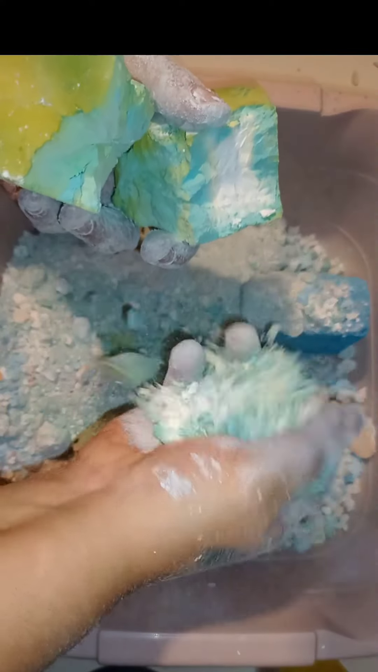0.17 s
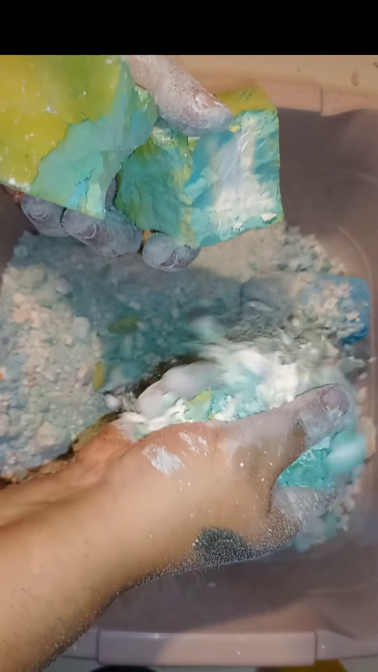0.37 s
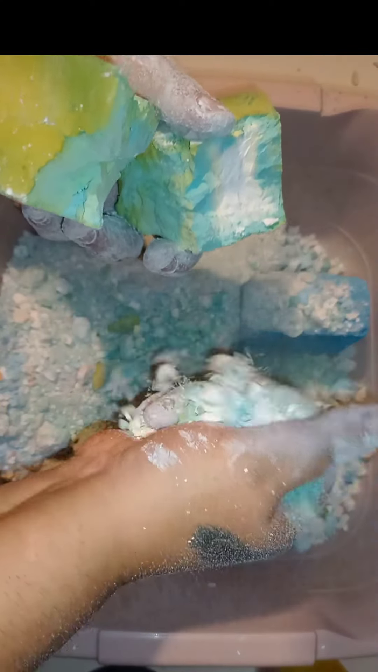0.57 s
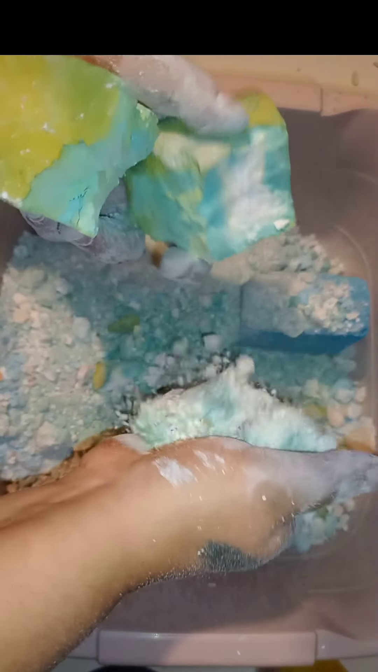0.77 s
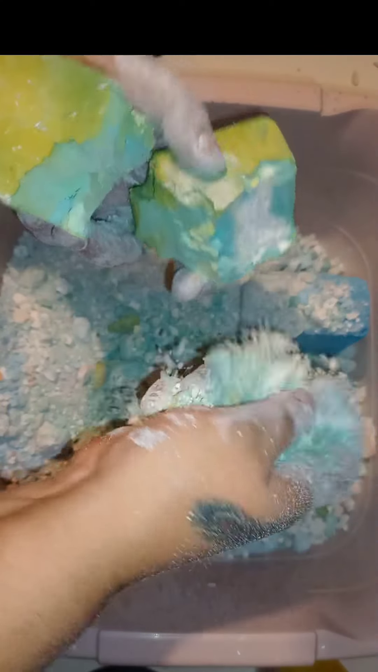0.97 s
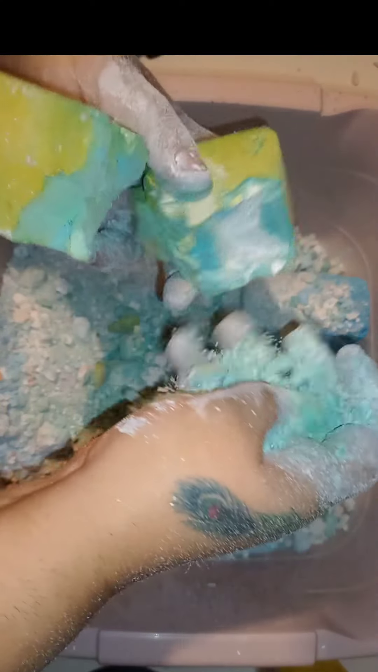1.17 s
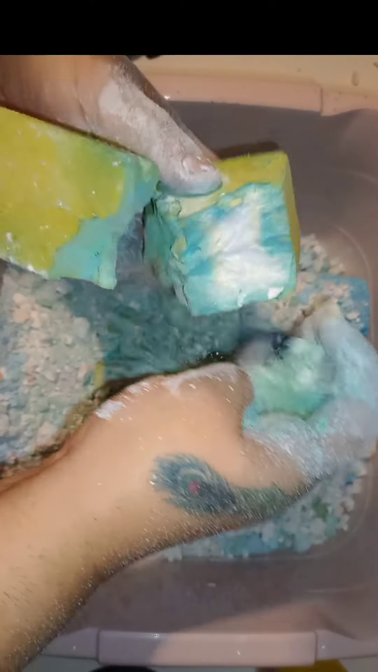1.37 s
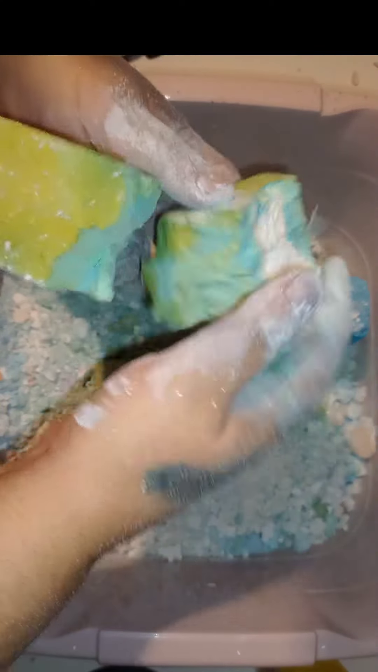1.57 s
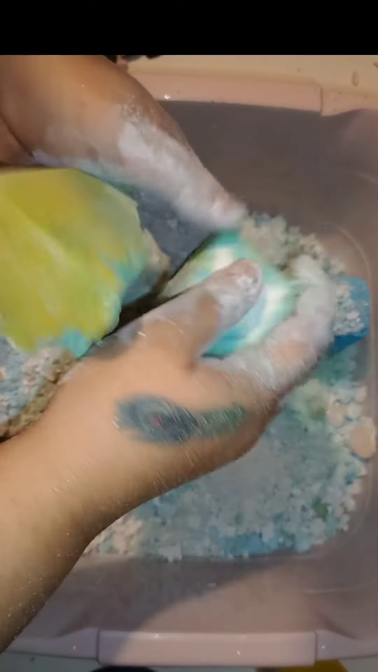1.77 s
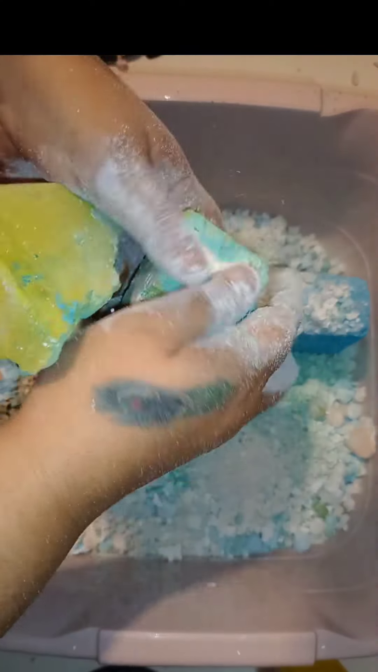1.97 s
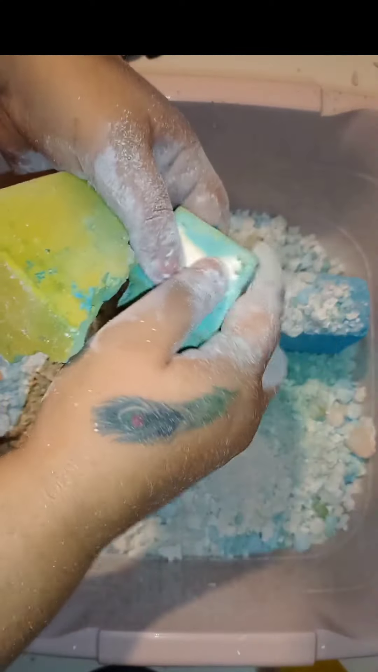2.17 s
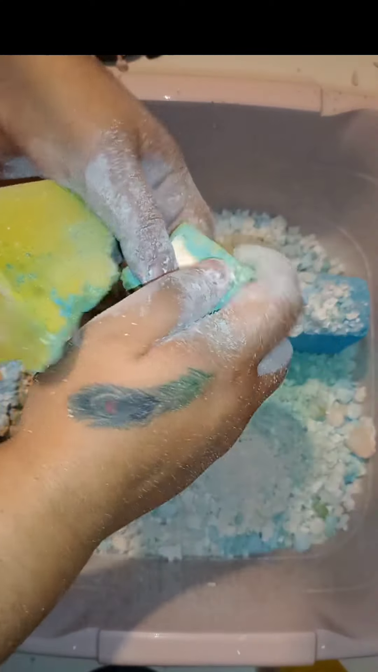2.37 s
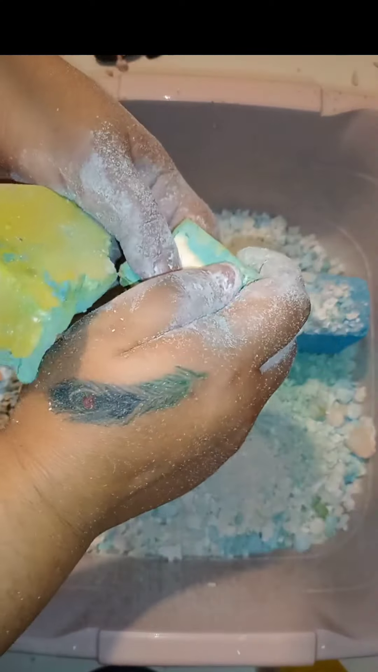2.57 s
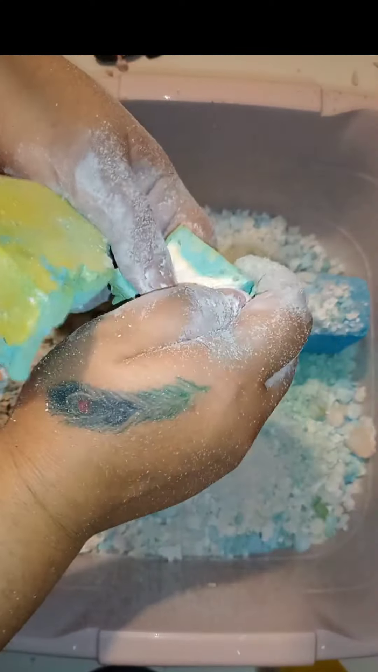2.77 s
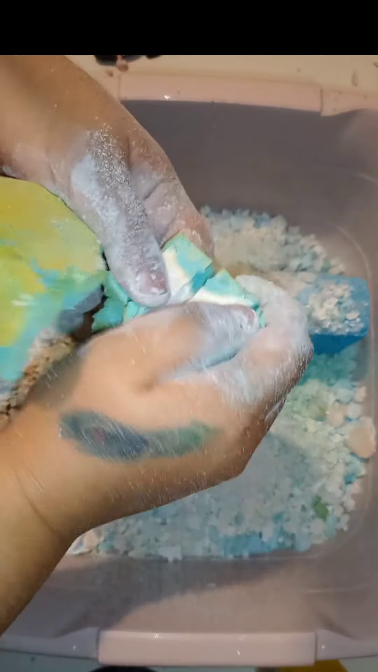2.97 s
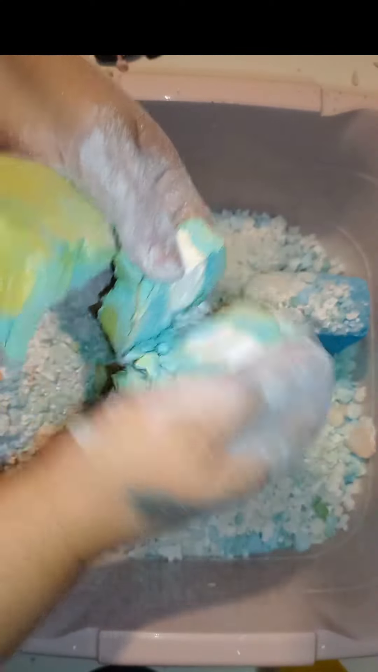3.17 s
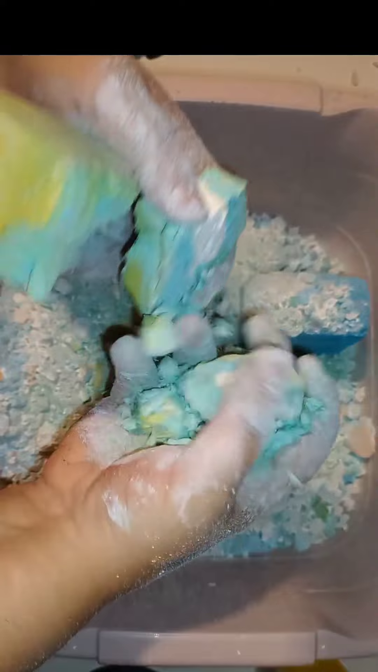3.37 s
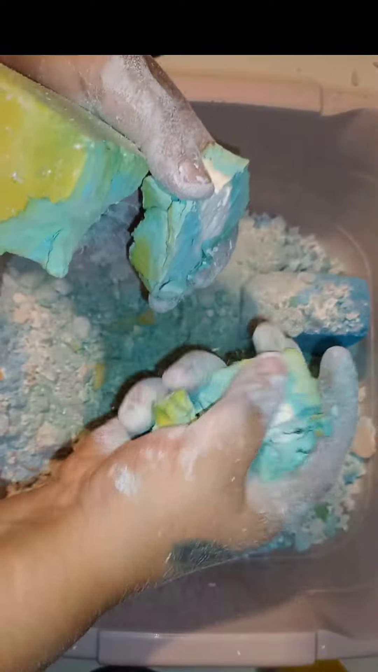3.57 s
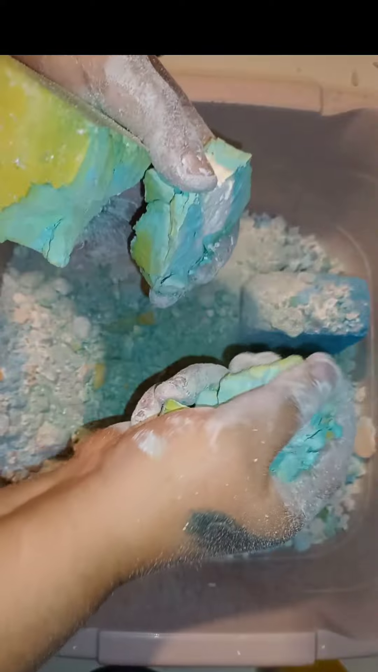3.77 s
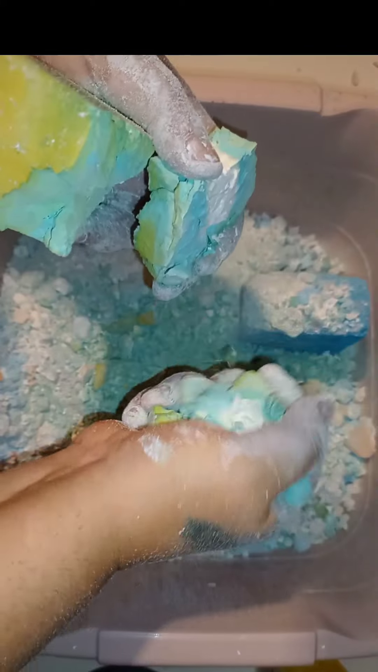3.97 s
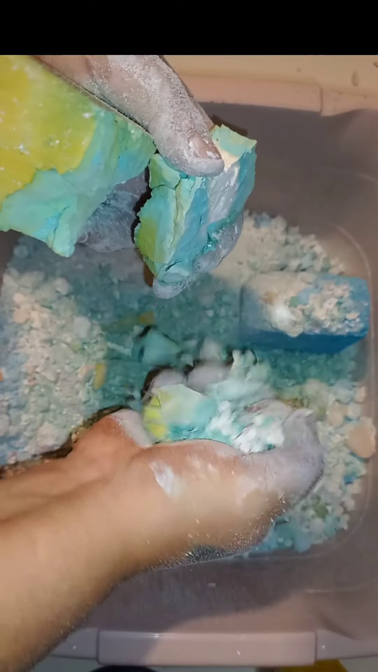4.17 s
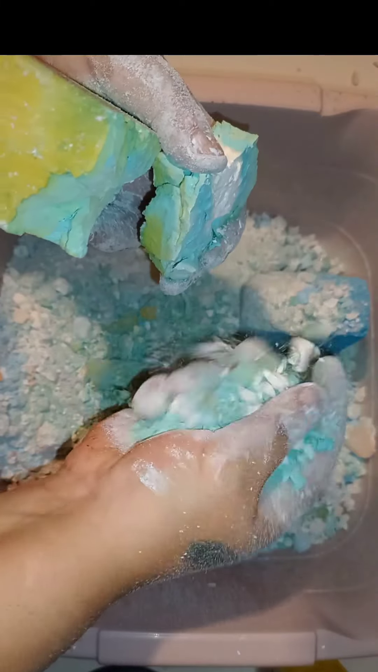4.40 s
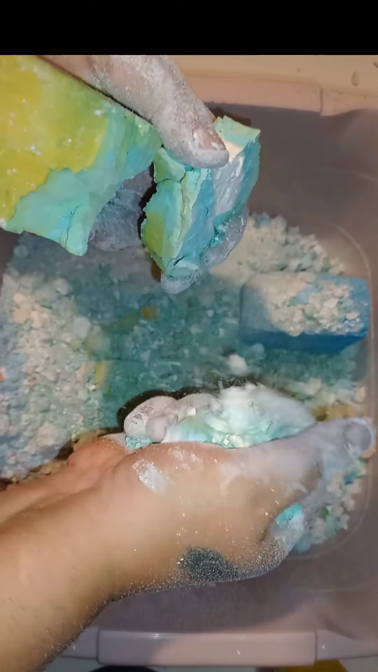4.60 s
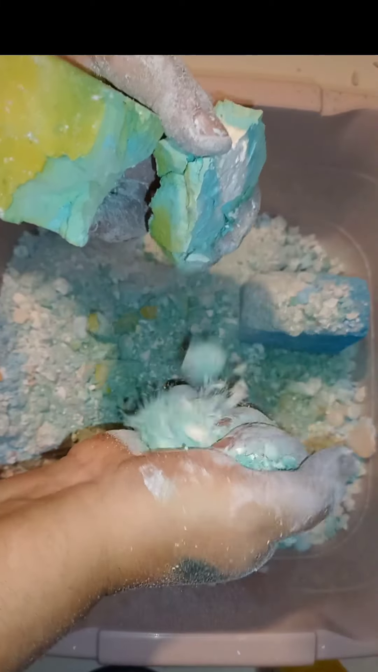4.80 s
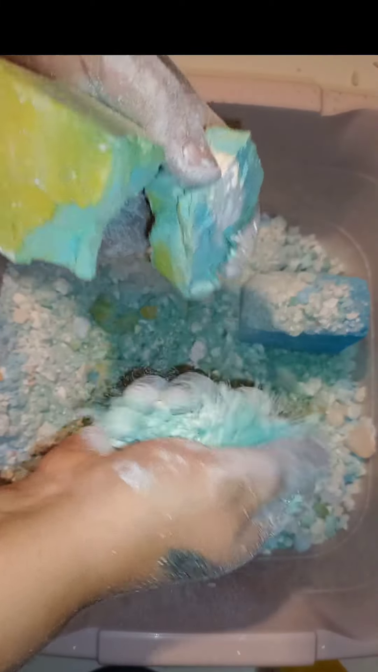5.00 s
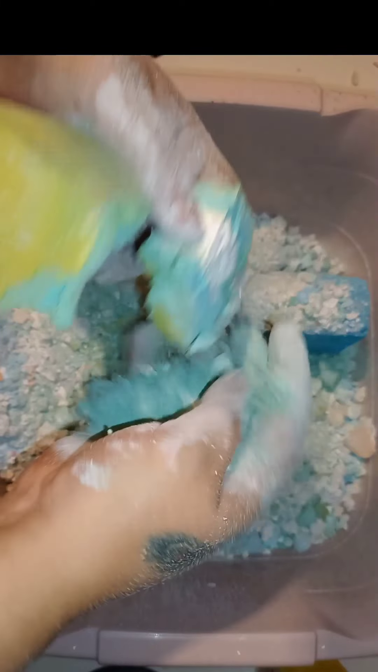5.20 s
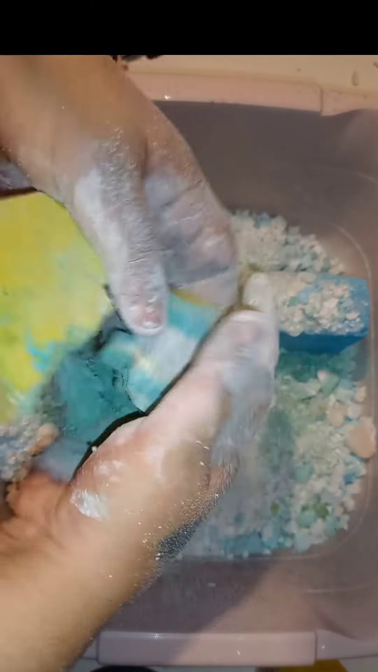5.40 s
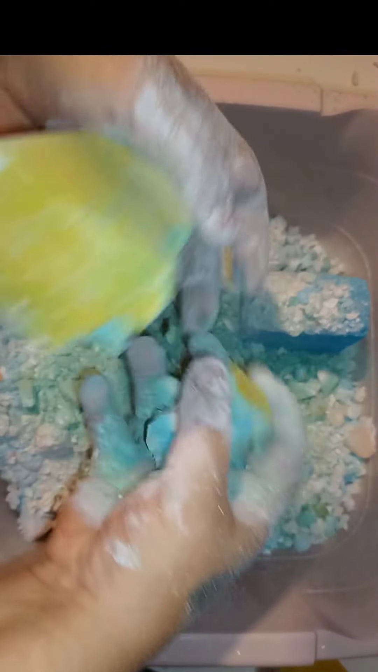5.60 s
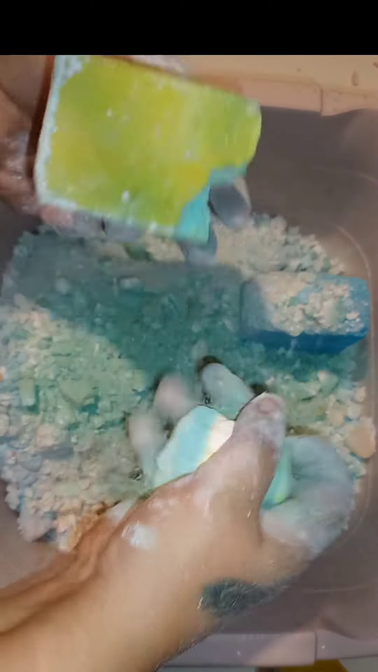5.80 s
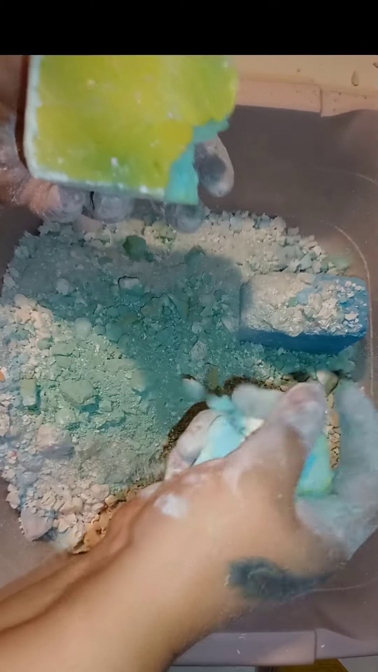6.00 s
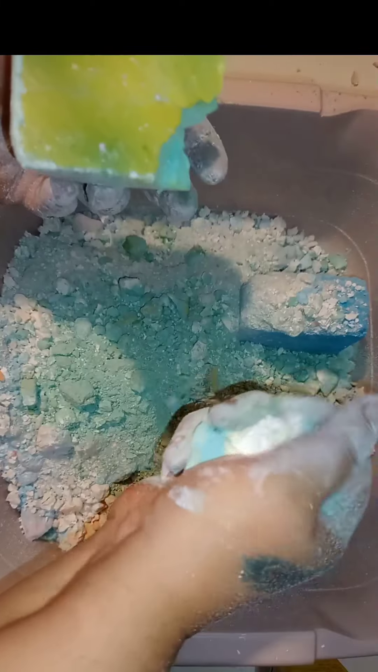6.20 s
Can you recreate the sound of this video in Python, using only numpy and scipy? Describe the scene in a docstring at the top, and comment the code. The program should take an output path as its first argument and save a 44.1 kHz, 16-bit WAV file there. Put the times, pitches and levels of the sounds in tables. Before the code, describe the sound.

Brittle dry lumps crack and crumble in squeezing hands, crisp and close, identical in both channels. Heavy crunching comes first, with crumbs pattering on hollow plastic and a low handling rumble, then dwindles to fine grains. Two tiny finger squeaks frame a near silence before one hard snap. Crushing then resumes, more scattered, with soft tub thuds, dusty hiss and a closing cluster of cracks, over faint room tone.

```python
"""Crushing dry chalk

Hands crush dry chalk over a plastic tub, close to one microphone; both channels are alike.
Lumps crack: a snap and a noise burst drive a resonance. Crumbs crackle: random clicks ring by size.
Dust hisses and rustles as noise, knocks and crumbs ring the tub's modes, a slipping finger squeaks
as resonant noise. Low noise swells as a rumble over a quiet room."""
import sys
import numpy as np
from scipy import signal
from scipy.fft import rfft, irfft
from scipy.io import wavfile

SR = 44100
rng = np.random.default_rng(int(sys.argv[2]) if len(sys.argv) > 2 else 0)


def generate_wav(sig):
    """Save sig (samples, or channels by samples) to the path in sys.argv[1] as 16-bit PCM at SR."""
    pcm = np.round(np.clip(np.atleast_2d(sig).T, -1, 1) * 32767).astype(np.int16)
    wavfile.write(sys.argv[1], SR, pcm)


N = 275580


def from_db(db):
    """dB to gain."""
    return 10 ** (np.asarray(db) / 20)


def rms_one(x):
    """Scale to rms 1."""
    return x / np.sqrt(np.mean(x ** 2) + 1e-20)


def at_hz(spectrum, hz):
    """Spectrum table in dB, interpolated over log frequency."""
    table_hz, table_db = np.transpose(spectrum)
    return np.interp(np.log(hz), np.log(table_hz), table_db)


def drift(rate_hz):
    """Slow noise of rms 1: two-pole low-pass, run at SR / 40."""
    step = 40
    r = np.exp(-2 * np.pi * step * rate_hz / SR)
    settle = 2000
    white = rng.standard_normal(N // step + settle + 2)
    slow = signal.lfilter([1], [1, -2 * r, r * r], white)[settle:]
    return np.interp(np.arange(N) / step, np.arange(len(slow)), rms_one(slow))


def resonance(x, hz, width_hz):
    """Two-pole band-pass, gain about 1 on top."""
    r = np.exp(-np.pi * width_hz / SR)
    zeros = np.array([1, 0, -1]) * (1 - r * r) / 2
    poles = [1, -2 * r * np.cos(2 * np.pi * hz / SR), r * r]
    return signal.lfilter(zeros, poles, x)


def band(x, low_hz, high_hz):
    """Butterworth band-pass along the last axis."""
    return signal.sosfilt(signal.butter(2, [low_hz, high_hz], "band", fs=SR, output="sos"), x)


def coloured(x, spectrum):
    """Filter x by a spectrum table."""
    hz = np.maximum(np.arange(len(x) // 2 + 1) * SR / len(x), 1)
    return irfft(rfft(x) * from_db(at_hz(spectrum, hz)), len(x))


def grit(shape, spread_db):
    """White noise of uneven grain: a few samples stand far out."""
    white = rng.standard_normal(shape)
    grain_db = spread_db * np.minimum(rng.exponential(1, shape), 5)
    return white * from_db(grain_db)


def swell_db(top_s, hold_s, rise_db_per_s, fall_db_per_s):
    """Rise to 0 dB at top_s, hold, fall."""
    t = np.arange(N) / SR - top_s
    return np.minimum(0, np.minimum(rise_db_per_s * t, fall_db_per_s * (hold_s - t)))


# Cracks of lumps: t/s, body peak level/dB, ring f/Hz, ring gain/dB, treble level/dB, low grit level/dB, t60/s
CRACKS = [(0.0343, -21, 4900, 17, -42.5, -46, 0.059), (0.051, -12.5, 4520, 4, -44, -39, 0.11),
          (0.1025, -14.5, 1155, 10, -43, -34.5, 0.15), (0.1974, -12.5, 1410, -7, -36.5, -29.5, 0.05),
          (0.2423, -21.5, 1940, 10, -45, -41, 0.062), (0.263, -21.5, 1250, 1, -43, -43, 0.089),
          (0.3425, -13, 6000, 11.5, -38, -39, 0.027), (0.3696, -15, 7730, 11, -33.5, -40, 0.033),
          (0.4768, -17.5, 1780, 27, -35.5, -29, 0.031), (0.5465, -16, 4970, 17, -37, -38, 0.1),
          (0.5623, -12, 7400, 11, -27, -37, 0.037), (0.5868, -12.5, 1540, 14, -39, -27, 0.017),
          (0.6881, -16.5, 3470, 2, -45, -39, 0.05), (0.6974, -26, 3080, 14, -30, -49, 0.025),
          (0.8996, -4, 2800, 6, -36.5, -38, 0.028), (0.9647, -23, 4870, -1, -48, -44.5, 0.15),
          (1.051, -23, 5370, 5, -40, -48, 0.056), (1.064, -20, 2920, -11, -62, -43, 0.095),
          (1.173, -28, 5710, 22, -51, -55, 0.064), (1.27, -35.5, 1190, 9, -55, -43, 0.1),
          (1.3428, -31.5, 1416, 12, -55, -52, 0.13), (1.4316, -26.5, 1490, 12, -51, -50, 0.05),
          (1.506, -28.5, 4530, 5, -48, -59, 0.059), (1.6147, -26.5, 3760, 6, -51, -55, 0.04),
          (1.6911, -31, 6100, 7, -54, -53, 0.034), (1.7548, -32.5, 3340, 9, -57, -48.5, 0.05),
          (1.7827, -25, 2940, -3, -52, -46, 0.15), (2.0002, -37, 2960, 5, -62, -57, 0.024),
          (2.7048, -25.5, 2260, 11, -67, -71, 0.036), (2.7566, -41.5, 2200, 9, -71, -70, 0.041),
          (2.8002, -28.5, 2190, 8, -55, -59, 0.05), (2.8228, -12.5, 2110, 19, -38, -31.5, 0.094),
          (2.8333, 1, 3790, 6, -32.5, -26, 0.026), (3.0705, -16, 3370, 5.5, -58, -50, 0.043),
          (3.1622, -29, 1420, 24, -58, -53, 0.042), (3.2455, -31.5, 7040, 15, -48, -64, 0.031),
          (3.3076, -36.5, 2140, 5, -53.5, -53, 0.15), (3.5286, -34, 3290, 19, -46, -57, 0.15),
          (3.5902, -27.5, 6270, 8, -49, -55, 0.15), (3.643, -32.5, 6000, 14, -49.5, -50.5, 0.13),
          (3.674, -15.5, 3010, 7, -49, -53, 0.04), (3.709, -16, 2210, 8, -43.5, -40.5, 0.054),
          (3.7606, -27, 2740, 13, -51, -50, 0.05), (3.7984, -13.5, 2140, 5, -44.5, -44.5, 0.091),
          (3.8893, -23.5, 2160, 5, -42, -48, 0.057), (3.925, -19, 1420, 4.5, -36.5, -40, 0.077),
          (3.9517, -21, 3770, 4, -49, -42.5, 0.05), (3.9792, -16, 4350, 10, -36.5, -40, 0.05),
          (4.0198, -10, 1030, 8, -30, -41, 0.05), (4.0686, -21, 1030, 19, -43.5, -38, 0.15),
          (4.125, -10.5, 3140, 5, -43, -30.5, 0.044), (4.1631, -10.5, 1550, 2, -33, -28, 0.056),
          (4.1734, -10.5, 3630, -4, -43, -36, 0.042), (4.3439, -24, 1440, 16, -50, -38.5, 0.086),
          (4.4416, -19.5, 3480, 5, -44, -46, 0.029), (4.512, -8, 2610, 10, -40, -30.5, 0.017),
          (4.6001, -25, 1100, 9, -49, -35.5, 0.05), (4.6394, -26, 1610, 9, -50, -36, 0.055),
          (4.6641, -18.5, 1600, 6.5, -43, -31.5, 0.073), (4.7353, -30, 7050, 17, -46, -46, 0.088),
          (4.8319, -24.5, 1070, 23, -52, -42.5, 0.15), (4.8578, -20, 2310, 4, -41.5, -35.5, 0.14),
          (4.9756, -27, 3930, 14, -46, -58, 0.05), (5.011, -28.5, 4280, 13, -61, -63, 0.041),
          (5.0352, -25, 2370, 4, -56, -63, 0.087), (5.0903, -18, 1015, 14, -36, -37.5, 0.14),
          (5.1385, -27, 1630, 7, -51, -41, 0.045), (5.161, -21.5, 1370, 9, -49, -49, 0.056),
          (5.2405, -32, 2720, 11, -58, -44.5, 0.067), (5.3228, -24, 1860, 13.5, -46.5, -53, 0.018),
          (5.3752, -18.5, 2800, -2.5, -40, -47, 0.11), (5.434, -21.5, 1940, 4, -62, -55, 0.11),
          (5.5037, -24, 3520, 7, -48, -48.5, 0.086), (5.6495, -31, 6100, 26, -48, -54, 0.043),
          (5.663, -28.5, 2510, 15.5, -55, -41, 0.14), (5.8477, -20, 3790, 14, -41, -47, 0.12),
          (5.8674, -15.5, 2010, -1, -36, -49, 0.11), (5.9718, -18, 5620, 17, -46, -47, 0.045),
          (5.989, -26.5, 3400, 9, -52, -47.5, 0.066), (6.0302, -19.5, 2270, 14.5, -45, -45, 0.046),
          (6.0561, -26, 1900, 27, -58, -36, 0.028), (6.0641, -23, 2600, 29, -55, -35, 0.05),
          (6.0836, -22.5, 2150, 31, -49, -40, 0.04), (6.119, -8.5, 2650, 4, -39, -33, 0.071),
          (6.1492, -12, 1360, 5, -37, -29.5, 0.11)]
# Colour of breaking chalk, also used for crumbs: f/Hz, level/dB per Hz
GRIT = [(290, -3), (500, 5.5), (545, -1), (988, -7.5), (1320, -1), (2230, 6.5), (5240, 2.5), (7750, 2),
        (8830, -13), (13600, -17), (16000, -22)]
CREEP_DB, CREEP_S = -8, 0.0034   # top and time constant of the growth before a crack
SNAP_DB, SNAP_DB_PER_DB = 11.5, 0.28   # snap gain at a -18 dB peak; its rise with peak level
RING_WIDTH = .06   # share of ring f


def cracks():
    """A fracture creeps, snaps through a lump and dies away as grit; the lump rings at its own pitch."""
    lead = SR // 40
    t_s = np.arange(-lead, SR // 6) / SR
    after_s = np.maximum(t_s, 0)
    creep = np.where(t_s < 0, from_db(CREEP_DB) * np.exp(t_s / CREEP_S), 1)
    snap = 2 * np.sin(2 * np.pi * 3000 * after_s) * np.exp(-(after_s / 0.00014) ** 2)   # push, recoil
    onset = slice(lead - 200, lead + 600)   # sets the rms of treble and low grit
    noise = grit((len(CRACKS), len(t_s)), spread_db=3.5)
    out = np.zeros(N + len(t_s))
    for (s, peak_db, hz, ring_db, treble_db, low_db, t60_s), white in zip(CRACKS, noise):
        fall = from_db(-60 * after_s / np.clip(t60_s, .008, .3))
        fall = fall + 0.5 * from_db(-60 * after_s / 0.13)   # common tail
        burst = rms_one(coloured(white, GRIT)) * creep * fall
        snap_db = SNAP_DB + SNAP_DB_PER_DB * (peak_db + 18)
        force = burst + from_db(snap_db) * snap
        ring = from_db(ring_db) * resonance(force, hz, RING_WIDTH * hz)
        body = band(force, 1200, 8000) + ring
        sound = body / np.max(np.abs(body)) * from_db(peak_db)
        treble = band(burst, 7800, 15500)
        low = band(burst, 700, 1500)
        sound = sound + from_db(treble_db) * treble / np.std(treble[onset])
        sound = sound + from_db(low_db) * low / np.std(low[onset])
        at = round(s * SR)
        out[at:at + len(t_s)] += sound
    return out[lead:N + lead]


# Crumbling: t/s, crackle level/dB, coarse grit level/dB, patter on the tub level/dB
CRUMBLE = [(0.0, -38, -45, -44), (0.26, -37, -39, -36.5), (0.61, -36.5, -39.5, -38),
           (0.73, -35.5, -39.5, -35), (.84, -48.5, -51.5, -42.5), (1.1, -45.5, -55.5, -47),
           (1.34, -48, -49.5, -46.5), (1.75, -50, -60, -44.5), (1.98, -60, -64, -54.5),
           (2.66, -60.5, -63, -54), (2.92, -77, -64.5, -62.5), (3.5, -61, -64, -62.5),
           (3.71, -41, -56, -49.5), (3.86, -50, -53.5, -55), (4.02, -43, -49.5, -51.5),
           (4.16, -44, -47.5, -48), (4.31, -55, -46, -58), (4.37, -46, -55.5, -50),
           (4.52, -40.5, -39, -31.5), (4.68, -39.5, -40.5, -36.5), (4.79, -51.5, -42, -38),
           (4.93, -54.5, -58, -52), (5.08, -40, -52, -45), (5.28, -52.5, -51.5, -47.5),
           (5.36, -61, -58, -45.5), (5.41, -38, -56, -41), (5.6, -41.5, -59, -40.5),
           (5.72, -56, -61, -50.5), (5.93, -51.5, -59, -51), (6.08, -38.5, -40.5, -37.5),
           (6.18, -42, -52, -43.5), (6.25, -53, -55, -47.5)]


def crumble_levels_db():
    """Crackle, coarse grit and patter levels, interpolated to every sample."""
    s, *levels_db = np.transpose(CRUMBLE)
    return [np.interp(np.arange(N) / SR, s, level_db) for level_db in levels_db]


# Puffs of fine dust sliding off the hands: t/s of top, hold/s, level/dB
RUSTLES = [(.45, .04, -46), (1.83, 0.043, -53.5), (3.32, 0.046, -68), (4.736, 0.018, -58.5),
           (4.93, 0.034, -54), (5.288, .03, -66), (5.5, 0.11, -61), (5.827, .04, -56)]
RUSTLE_RISE_DB_PER_S, RUSTLE_FALL_DB_PER_S = 300, 300
DUST_DB, DUST_DB_PER_DB = -65, .7   # level at -50 dB crackle; share of the crackle's swing


def dust_level(crackle_db):
    """Gain of the fine dust: it follows the crackle, and puffs add to it."""
    level = from_db(DUST_DB + DUST_DB_PER_DB * (crackle_db + 50))
    for s, hold_s, db in RUSTLES:
        level = level + from_db(db + swell_db(s, hold_s, RUSTLE_RISE_DB_PER_S, RUSTLE_FALL_DB_PER_S))
    return level


CRUMBS_PER_S, TICKS_PER_S = 26000., 1200
CHIPS_PER_S, CHIP_DB, CHIP_WIDTH_HZ = 600, 5, 35   # harder crumbs that ring longer


def crumbling(crackle, coarse, dust):
    """Tiny fractures in clumps; each crumb rings some cycles, small crumbs high and large ones low."""
    born = rng.random(N) < CRUMBS_PER_S * from_db(2.5 * drift(25)) / SR
    clicks = grit(N, spread_db=2.5) * born * from_db(1.73 * drift(40))
    chips = grit(N, spread_db=2.0) * (rng.random(N) < CHIPS_PER_S / SR)
    chips = rms_one(chips) * np.std(clicks)
    pitches_hz = np.geomspace(600, 15000, 40)
    dealt = rng.integers(0, 40, N)   # pitch index of each click
    sizes = np.zeros((3, N))   # coarse, middling, fine
    for k, hz in enumerate(pitches_hz):
        mine = dealt == k
        crumb = resonance(clicks * mine + 1e-18, hz, 0.084 * hz)
        middling = 1600 < hz < 9500   # only these pitches have chips
        crumb += from_db(CHIP_DB) * resonance(chips * mine * middling + 1e-18, hz, CHIP_WIDTH_HZ)
        patches_db = 4.1 * drift(6.8)   # crumbs of one size come and go
        size = int(hz > 1450) + int(hz > 8000)
        sizes[size] += from_db(at_hz(GRIT, hz) + patches_db) * crumb
    ticks = grit(N, spread_db=6.5) * (rng.random(N) < TICKS_PER_S / SR)   # dry breaks, no ring
    ticks = rms_one(band(ticks, 2300, 6400))
    hiss = rms_one(band(coloured(rng.standard_normal(N), GRIT), 8000, 20000))   # finest dust, even
    sizes[1] = band(rms_one(sizes[1]) + .65 * ticks, 1000, 7450)
    sizes[2] = rms_one(sizes[2]) + 1.1 * hiss
    return sum(level * rms_one(size) for level, size in zip((coarse, crackle, dust), sizes))


# Knocks on the tub: t/s, drive level/dB, f/Hz favoured by the spot hit
KNOCKS = [(0.059, -31, 347), (0.195, -20.5, 395), (0.37, -20.5, 310), (0.698, -27.5, 326),
          (1.264, -32.5, 296), (1.614, -32, 344), (2.001, -23.5, 374), (2.83, -20.5, 402),
          (3.673, -24, 224), (3.759, -30, 231), (3.923, -37, 383), (4.019, -35, 339), (4.348, -6, 180),
          (4.352, -22, 340), (4.466, -16, 222), (4.592, -40, 317), (4.83, -23.5, 360), (5.038, -34, 350),
          (5.377, -18.5, 355), (5.436, -28.5, 335), (5.577, -28, 405), (5.982, -10.5, 165),
          (6.03, -18.5, 234), (6.141, -19, 229)]
# Modes of the tub: f/Hz, level/dB, t60/s
TUB = [(172, -6, 0.1), (231, -3, 0.082), (291, -5.5, 0.086), (345.3, 0, 0.083), (396.3, -0.5, 0.074),
       (530, -10, .05)]


def tub(patter_db):
    """Knocks and falling crumbs ring the modes; a knock drives most those near the pitch of its spot."""
    s, drive_db, spot_hz = np.transpose(KNOCKS)
    at = np.round(s * SR).astype(int)
    shape = (len(TUB), N)
    crumbs = (rng.random(shape) < 250 / SR) * grit(shape, spread_db=5.0)
    knocks, patter = np.zeros(N), np.zeros(N)
    for (hz, level_db, t60_s), fall in zip(TUB, crumbs):
        r = from_db(-60 / (t60_s * SR))
        w = 2 * np.pi * hz / SR
        blows = np.zeros(N)
        blows[at] = from_db(drive_db + level_db - 24 * np.abs(np.log2(hz / spot_hz)))
        forces = [blows + 1e-18, fall + 1e-18]
        rung = signal.lfilter([0, np.sin(w)], [1, -2 * r * np.cos(w), r * r], forces)
        knocks += rung[0]
        patter += from_db(level_db) * rung[1]
    knocks = band(band(knocks, 185, 500), 93, 626)   # soft contact, small shell: no tick, no deep bass
    return knocks + from_db(patter_db) * rms_one(patter)


# A finger slips on the chalk: t/s of top, level/dB
SLIPS = [(1.865, -38), (2.662, -36)]
# Resonances of the squeak: f/Hz, width/Hz, relative level/dB
SQUEAK = [(4700, 210, -10), (5080, 200, 1), (6000, 69, 1.5), (7820, 200, -7), (10300, 540, -12)]
SLIP_RISE_DB_PER_S, SLIP_FALL_DB_PER_S = 600, 795


def slip():
    """Skin rubs the dry surface: noise squeezed through a few high resonances."""
    white = band(rng.standard_normal(N), 4300, 11000)
    squeak = sum(from_db(db) * rms_one(resonance(white, hz, width_hz)) for hz, width_hz, db in SQUEAK)
    level = sum(from_db(db + swell_db(s, 0, SLIP_RISE_DB_PER_S, SLIP_FALL_DB_PER_S)) for s, db in SLIPS)
    return rms_one(squeak) * level


# Swells of the rumble: t/s of top, hold/s, deep level/dB, upper level/dB
SWELLS = [(0.248, 0.035, -50, -36), (0.446, 0.064, -30.5, -57), (0.664, .4, -29, -42),
          (1.3, 0.067, -43.5, -48), (1.67, 0.032, -63, -47), (1.98, 0.14, -55, -53),
          (2.386, 0.038, -42.5, -58), (2.705, .05, -50.5, -57), (3.556, 0.14, -43.5, -60),
          (4.23, 0.032, -44, -61), (4.49, 0.052, -41, -40), (4.78, 0.045, -35, -50),
          (5.035, 0.056, -42, -45.5), (5.19, 0.13, -45.5, -43.5), (5.446, 0.036, -55, -44.5),
          (5.55, 0.11, -39.5, -48), (5.945, 0.11, -45, -57)]
# Resonances, deep and upper: f/Hz, width/Hz
RUMBLE = [(57, 12.1), (94, 26.2)]
# Level between swells: deep/dB, upper/dB
REST_DB = -60, -58
SWELL_RISE_DB_PER_S, SWELL_FALL_DB_PER_S = 157, 125


def rumble():
    """Low noise in two narrow resonances that swell while the hands work."""
    levels = from_db(REST_DB)[:, None]
    for s, hold_s, *tops_db in SWELLS:
        swell = from_db(swell_db(s, hold_s, SWELL_RISE_DB_PER_S, SWELL_FALL_DB_PER_S))
        levels = levels + np.outer(from_db(tops_db), swell)
    out = np.zeros(N)
    for (hz, width_hz), level in zip(RUMBLE, levels):
        once = resonance(rng.standard_normal(N), hz, width_hz)
        out += level * rms_one(resonance(once, hz, width_hz))
    return out


# Colour of the room: f/Hz, level/dB per Hz
ROOM = [(65, -47), (110, 3), (167, -3.5), (253, -2.5), (417, -15), (493, -2), (571, -24), (981, -6),
        (1550, -64), (6670, -35), (16000, -45)]
ROOM_DB = -58


def room():
    """Steady room tone: coloured noise."""
    return from_db(ROOM_DB) * rms_one(coloured(rng.standard_normal(N), ROOM))


def scene():
    """Sum of all sources, alike on both channels."""
    crackle_db, coarse_db, patter_db = crumble_levels_db()
    mono = room()
    mono = mono + crumbling(from_db(crackle_db), from_db(coarse_db), dust_level(crackle_db))
    mono = mono + cracks() + slip() + tub(patter_db) + rumble()
    return np.array([mono, mono])


CUTOFF_HZ = 16300   # 70 dB down from here up


def record(dry):
    """Soft limiting rounds the loudest peaks; a steep low-pass cuts the top."""
    rounded = .9 * np.tanh(dry / .9)
    return signal.sosfilt(signal.cheby2(14, 70, CUTOFF_HZ, fs=SR, output="sos"), rounded)


dry = scene()
out = record(dry)
generate_wav(out)
```